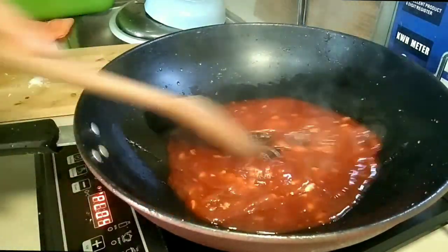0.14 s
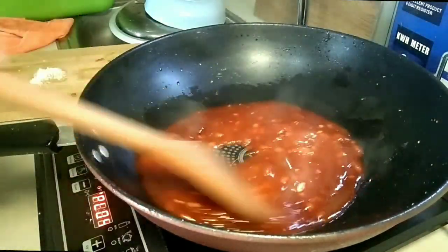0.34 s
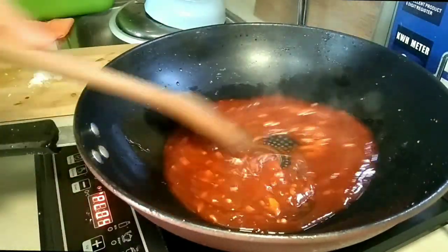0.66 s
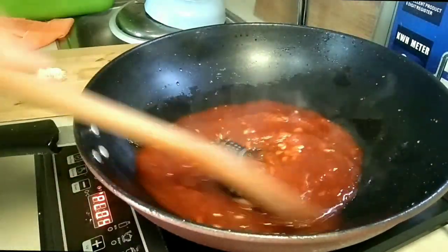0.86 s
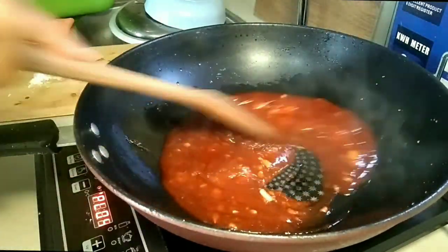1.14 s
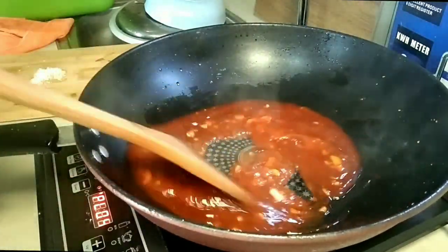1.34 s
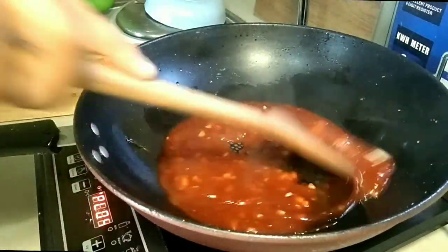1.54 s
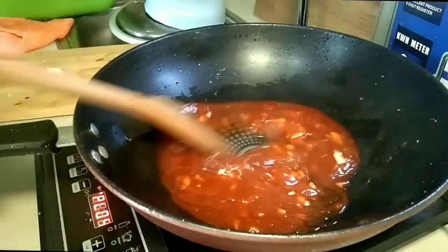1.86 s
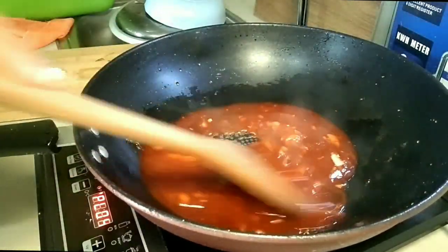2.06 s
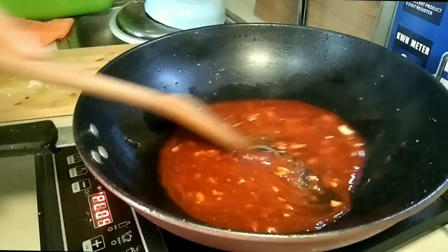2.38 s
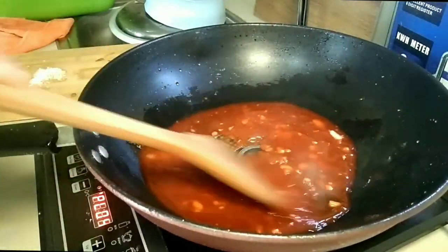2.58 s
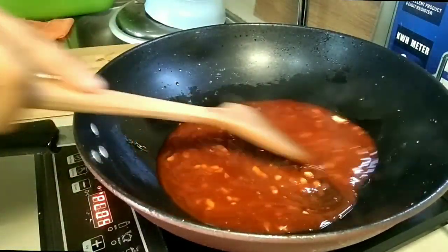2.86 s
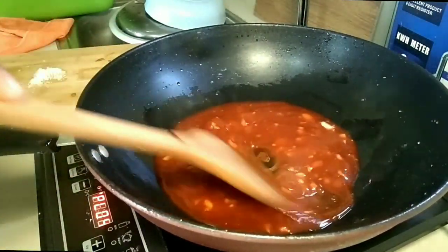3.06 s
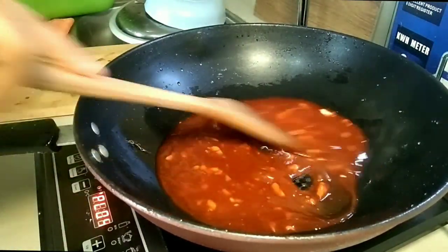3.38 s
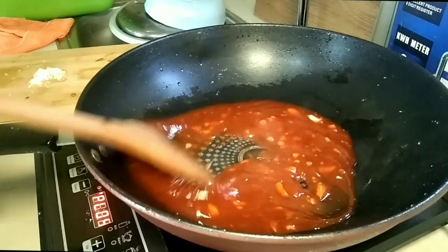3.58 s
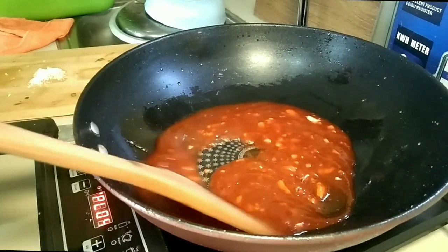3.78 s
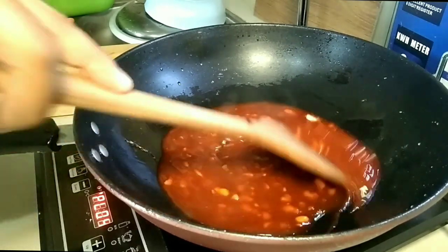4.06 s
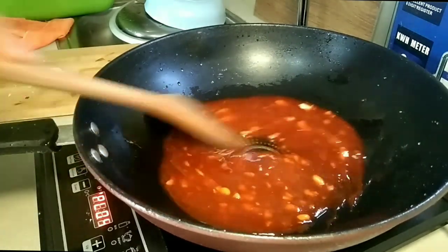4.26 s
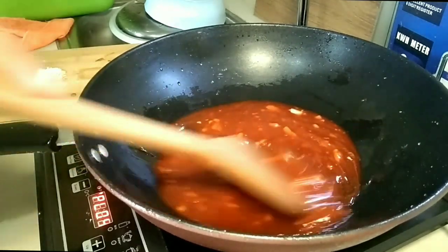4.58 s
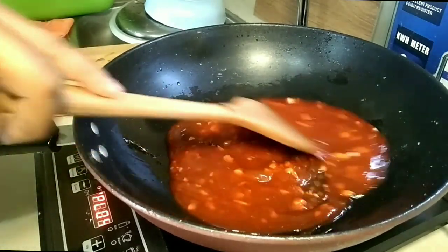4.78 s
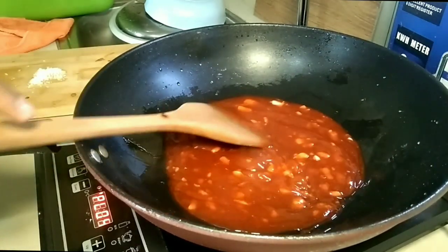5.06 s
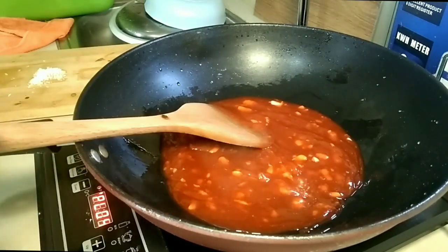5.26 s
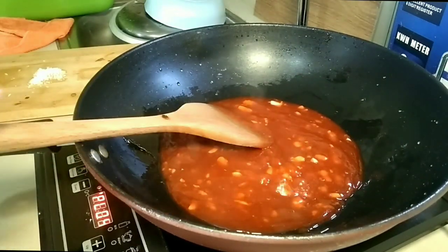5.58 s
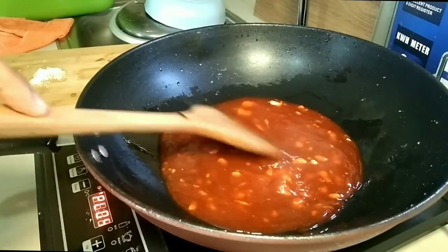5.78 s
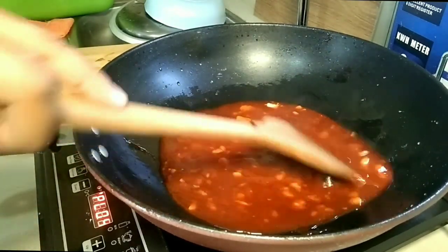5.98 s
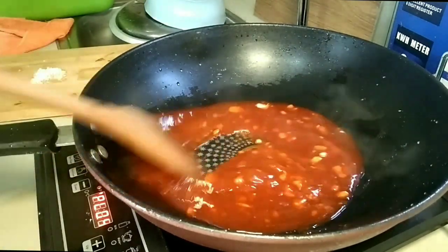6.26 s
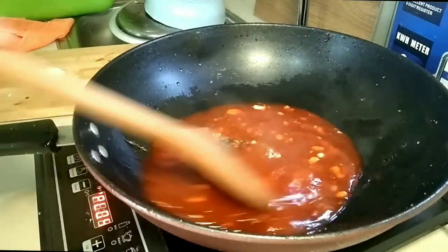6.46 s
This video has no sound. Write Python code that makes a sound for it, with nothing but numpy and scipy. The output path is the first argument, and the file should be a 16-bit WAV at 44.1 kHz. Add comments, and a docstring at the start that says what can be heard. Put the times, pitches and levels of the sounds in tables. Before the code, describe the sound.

Close, bursty frying hiss with snapping bubbles and wooden scrapes in a ringing wok, settling after two seconds, then briefly stirring up again.

```python
"""Thick sauce sizzles and spits in a steel wok while a wooden spatula scrapes through it, over the cooktop fan.
The sizzle is crackling noise with thin whistles; scraping, knocks and fan make the metal ring.
Splashes are swells of fizz, spits are snaps with a spray of steam, and plops are short rising tones.
A phone close by turns down whatever is steady, so the hiss comes in bursts and narrow flickering patches."""
import sys
import numpy as np
from scipy import signal
from scipy.fft import rfft, irfft, next_fast_len
from scipy.io import wavfile
from scipy.ndimage import uniform_filter1d

SR = 44100
rng = np.random.default_rng(int(sys.argv[2]) if len(sys.argv) > 2 else 0)


def file_out(sig):
    """Save sig as 16-bit WAV at sys.argv[1]."""
    # one column per channel
    cols = np.atleast_2d(sig).T
    # limit, then scale
    lim = np.clip(cols, -1, 1)
    pcm = np.round(lim * 32767).astype(np.int16)
    wavfile.write(sys.argv[1], SR, pcm)


N = 292383  # length in samples

# Table levels hold before the wall's ringing, the mix and the phone act on them.
# Sizzle of bared hot metal: (time [s], fine fizz [dB], coarse fizz [dB], wet crackle [dB])
SIZZLE_LEVELS = [(0.0, -38.5, -38.5, -45), (0.46, -38.5, -45, -49), (0.68, -35.5, -37, -43.5),
                 (0.96, -41, -44.5, -50.5), (1.2, -35.5, -43.5, -58), (1.48, -42, -47.5, -51),
                 (1.68, -44, -52.5, -68), (1.9, -43, -47.5, -52), (2.03, -49, -53.5, -56.5),
                 (2.3, -49.5, -55.5, -58), (2.6, -49.5, -63.5, -87), (3.4, -65, -79, -86),
                 (3.55, -55, -70.5, -81), (4.1, -50, -67, -105), (4.5, -57, -82, -77),
                 (5.07, -50, -55, -78), (5.5, -54.5, -89, -56), (5.7, -49.5, -76, -59),
                 (5.95, -46.5, -56, -59.5), (6.13, -48.5, -63, -60), (6.28, -43, -46, -46.5),
                 (6.45, -47, -62, -59.5), (6.63, -44, -54, -58.5)]
# Colour of each bubble size: (frequency [Hz], relative level [dB])
FINE_COLOUR = [(2350, -14), (4000, -11), (4390, -15.5), (5040, -0.5), (6220, -2), (8160, 1), (11000, -14),
               (14900, -24.5), (16000, -29)]
COARSE_COLOUR = [(2300, -6), (2900, -1.5), (3300, 6), (4000, 1), (4600, 3.5), (5300, -8), (6500, -48)]
WET_COLOUR = [(1500, -53), (1950, 9), (2300, 0), (2650, 3), (3200, -33.5)]
FINE_SPLIT_HZ, COARSE_SPLIT_HZ = 6320, 5230  # brightness tips about these pitches
WANDER_DB, WANDER_S = 2.5, 0.15  # typical drift of the bubble size, and the time between its turns
# Steam pockets that sing for a moment; each is loudest half of WHISTLE_S after it starts
WHISTLES_PER_S, WHISTLE_S, WHISTLE_SHARE = 550, 0.017, 0.44
# Upper resonances of the bare wall: (frequency [Hz], width [Hz], level before SHELL_DB is added [dB])
SHELL_MODES = [(2270, 65, 0.5), (2600, 22, -1), (2725, 107, -5), (3347, 25, -5.5), (3890, 40, 1),
               (5170, 41, -17), (8110, 920, -9.5)]
SHELL_DB = 1.5
# Two stretches of spatula dragging: (time [s], lower bowl drone [dB], upper bowl drone [dB], blade rasp [dB])
DRAG_LEVELS = [
    [(0.0, -45, -50, -52), (0.08, -50.5, -54, -69), (0.11, -47, -48, -50.5), (0.324, -57.5, -49.5, -54),
     (0.4, -60.5, -46.5, -48.5), (0.53, -48.5, -53.5, -57), (0.606, -47, -62, -45.5), (0.68, -47, -43, -45),
     (0.816, -52.5, -49, -56.5), (1.198, -57, -59, -53), (1.308, -61, -53, -55), (1.438, -76, -70, -52.5),
     (1.554, -55, -55, -62), (1.8, -84, -61, -85)],
    [(5.75, -91, -80, -83), (5.834, -60, -89, -76), (5.876, -53.5, -61, -52), (5.914, -60, -75, -57),
     (6.08, -82, -82, -80), (6.114, -51.5, -51, -70), (6.23, -72, -89, -110), (6.274, -50, -48.5, -45.5),
     (6.356, -49, -79, -65), (6.474, -62.5, -46.5, -87), (6.524, -54.5, -60, -79), (6.57, -55, -75, -75),
     (6.6, -75, -46.5, -88), (6.63, -77, -68, -76)],
]
# Bowl resonances: (frequency [Hz], width [Hz])
BOWL_MODES = [(570, 75), (775, 78)]
# Blade resonances: (frequency [Hz], width [Hz], relative level [dB])
BLADE_MODES = [(1577, 220, 0), (1306, 185, -14)]
# Colour of the fan rush and steady simmer: (frequency [Hz], relative level [dB])
STEADY_COLOUR = [(15, -46), (25, -31), (64, -7), (123, -10.5), (170, -5.5), (344, -10), (503, -12),
                 (1040, -4.5), (1480, -7.5), (3340, -15), (8140, -22), (11000, -31), (14800, -42),
                 (16000, -32)]
STEADY_DB = -48
# Fan housing resonances: (frequency [Hz], width [Hz], level [dB])
FAN_MODES = [(236, 72, -82), (414.2, 7.5, -62), (1028, 13, -61.5), (1625, 120, -60)]
# Spatula on the wok: (time [s], peak level [dB], best excited pitch [Hz], contact fade [s])
KNOCK_EVENTS = [(0.019, -39.5, 334, 0.044), (0.639, -34, 594, 0.017), (0.975, -41.5, 236, 0.0082),
                (1.385, -34.5, 1700, 0.014), (1.539, -42.5, 319, 0.022), (2.07, -42.5, 410, 0.0088),
                (2.445, -39.5, 570, 0.014), (3.479, -41.5, 1480, 0.013), (3.497, -40.5, 850, 0.0066),
                (3.927, -35, 340, 0.021), (4.521, -40.5, 333, 0.0063), (4.819, -41.5, 590, 0.004),
                (5.181, -31, 1350, 0.02), (5.197, -34, 1290, 0.017), (5.207, -44.5, 233, 0.027),
                (5.871, -41, 586, 0.024), (6.111, -42, 514, 0.0097), (6.208, -40, 400, 0.0046),
                (6.265, -38.5, 620, 0.004), (6.319, -46.5, 250, 0.012), (6.51, -37, 390, 0.025)]
# Ringing modes of the wok: (frequency [Hz], relative level [dB], time to fade by 60 dB [s])
WOK_MODES = [(236, 5, 0.16), (286.5, -2, 0.14), (409.5, 5.5, 0.092), (548.4, 6.5, 0.047), (758, 10.5, 0.04),
             (880, 5, 0.079), (1162, -2, 0.29), (1470, 4, 0.069), (1927, 3, 0.18), (2815, 2.5, 0.39)]
# The worktop is bumped: (time [s], peak level [dB], frequency [Hz], length [s])
WORKTOP_BUMP = (6.062, -52, 85, .035)
# Sauce slops onto the hot wall and fizzes up:
# (time [s], level before its swell and fade [dB], bubble pitch [Hz], spread [octaves], time to fade by 60 dB [s])
SPLASH_EVENTS = [(0.174, -23, 3070, 0.87, 0.17), (0.38, -31, 3500, 0.95, 0.15),
                 (0.492, -29.5, 6230, 0.55, 0.35), (0.655, -36, 5000, 1.3, 0.15),
                 (0.945, -35, 3160, 0.77, .15), (0.765, -29, 4530, .6, 0.19),
                 (1.05, -31.5, 3420, 0.42, 0.21), (1.385, -33, 2600, 0.88, 0.15),
                 (1.59, -44, 3580, 0.42, 0.28), (1.93, -51, 6500, .6, 0.2), (2.061, -64, 3350, .4, 0.17),
                 (2.16, -43.5, 6200, 0.58, 0.53), (2.35, -49, 6160, 0.62, 1),
                 (2.689, -42, 6600, 0.51, 0.44), (2.929, -49, 6950, .35, 0.91),
                 (3.229, -49, 7040, 0.28, 0.79), (3.43, -52, 8000, 0.34, 1),
                 (3.497, -49.5, 4660, 0.6, 0.81), (3.563, -45.5, 6850, 0.47, 1),
                 (3.89, -76, 7400, 0.48, .5), (4.118, -61, 5650, .6, 0.32),
                 (4.337, -35.5, 3680, 0.81, 0.23), (4.68, -48, 6000, 0.54, 0.73),
                 (5.02, -48.5, 7950, 0.28, 0.46), (5.18, -47, 2830, 0.2, 0.28),
                 (5.54, -43, 5100, 0.93, 0.23), (5.623, -33, 3650, 0.88, 0.37),
                 (6.19, -39.5, 5300, 0.7, 0.26), (6.264, -45, 3500, 1, 0.11), (6.321, -40, 5560, .8, 0.35),
                 (6.529, -51, 2750, 0.3, 0.11)]
SPLASH_RISE_S = 0.0032
# Bursting bubbles: (time [s], peak level [dB], centre [Hz], time for the tail to fade by 60 dB [s],
# spray under the snap [dB])
SPIT_EVENTS = [(0.178, -23.5, 2370, 0.12, -2), (0.389, -25.5, 3940, 0.053, 2),
               (0.4968, -22, 2720, 0.12, -1), (0.5595, -18.5, 4900, 0.08, 1),
               (0.6708, -19, 3310, 0.074, -7), (0.8785, -20, 7500, 0.087, -5),
               (0.9471, -20, 3450, 0.063, 0), (1.1119, -40, 7860, 0.13, -10), (1.134, -26, 8600, 0.14, -8),
               (1.384, -26.5, 1900, 0.12, -16), (1.5233, -28.5, 4160, 0.43, 1),
               (1.5911, -26, 3550, 0.13, -10), (1.6734, -28, 7300, 0.071, 4), (1.745, -43, 3780, 0.079, -1),
               (1.7926, -23, 7850, 0.057, -39), (1.83, -26, 7860, 0.049, -14),
               (1.933, -23.5, 5600, 0.16, -2), (1.963, -26.5, 7900, 0.18, 11),
               (2.0666, -30.5, 3700, 0.083, 2), (2.1637, -40, 6170, 0.22, -6),
               (2.207, -34.5, 2580, .15, -8), (2.3516, -35, 3240, 0.12, -6), (2.443, -33, 5800, 0.12, 2),
               (2.5635, -34, 6000, 0.11, -13), (2.6162, -36.5, 5450, 0.074, 0),
               (2.6918, -35.5, 7200, 0.17, 14), (2.9294, -30.5, 6400, 0.42, -14),
               (3.4974, -34, 7630, 0.24, -2.5), (3.5641, -29.5, 7900, 0.065, -30),
               (3.6327, -33.5, 7500, 0.15, -1), (3.698, -42, 8400, 0.095, -11),
               (3.724, -26.5, 6420, 0.2, -8.5), (3.8437, -39.5, 6680, 0.33, -2),
               (3.969, -34.5, 6670, 0.17, -6), (4.061, -63, 7370, 0.12, -14),
               (4.119, -31.5, 5760, 0.096, -4), (4.1688, -33, 5300, 0.063, -50),
               (4.301, -37, 7600, 0.39, 2), (4.341, -22.5, 3420, 0.17, -15), (4.681, -36.5, 4620, 0.18, -7),
               (4.807, -35, 3270, 0.12, -15), (5.012, -44, 7400, 0.17, -35),
               (5.0396, -39.5, 7880, 0.15, -12), (5.1796, -35, 2670, 0.3, -24),
               (5.5323, -36.5, 8300, 0.25, -29), (5.55, -37.5, 7700, 0.24, -2),
               (5.6246, -15, 4160, 0.17, -10), (5.7474, -37, 4780, 0.063, -30),
               (5.7816, -26, 7460, 0.083, -6), (5.83, -42, 7570, 0.082, -4),
               (5.875, -28.5, 7300, 0.071, -14), (5.9112, -39, 2590, 0.16, -6),
               (5.9714, -34, 5130, 0.13, -1), (6.151, -35, 8500, 0.14, -11), (6.1916, -32, 6200, 0.22, -13),
               (6.2628, -25, 4000, 0.096, -24), (6.323, -19, 7170, 0.041, 2), (6.4556, -36, 6760, 0.15, 0),
               (6.4875, -38, 5170, 0.16, 0), (6.5324, -30.5, 2320, 0.13, -8), (6.602, -28, 7960, 0.066, -9)]
# Large bubbles in the thick sauce: (time [s], peak level [dB], starting pitch [Hz])
PLOP_EVENTS = [(0.535, -42, 1103), (0.59, -41.5, 1250), (0.932, -39, 1345), (1.537, -44.5, 905),
               (1.62, -45.5, 890), (1.64, -46, 883), (1.73, -47, 890), (2.141, -45, 1026),
               (2.172, -48, 1010), (2.855, -48, 865), (3.106, -47.5, 880), (4.687, -44.5, 1120),
               (5.83, -43.5, 1200), (5.87, -44, 1247), (6.251, -41, 1464)]
PLOP_CYCLES, PLOP_GLIDE = 10.8, 0.012  # cycles in one unit of age, stretch of the phase per unit of age
# Phone: deepest cut, how much less the bass is cut, its extra threshold, and how far up the bass reaches
SUPPRESS_DB, BASS_LIFT_DB, BASS_OVER, BASS_HZ = -21, 9, 1.3, 1500
# Phone: threshold factor, averaging time, lean on the previous frame, quantile taken as the quiet level
OVER, HOLD_S, MEMORY, QUIET_SHARE = 0.8, 0.024, 0.96, 0.19
TOP_HZ = 15700


def undb(db):
    """Turn decibels into a gain."""
    return 10 ** (np.asarray(db) / 20)


def level(x, db):
    """Set the average strength (rms) of a sound."""
    return x * undb(db) / np.sqrt(np.mean(x ** 2))


def colour(x, points):
    """Shape the spectrum of a sound by (frequency, dB) points."""
    hz, db = np.transpose(points)
    size = next_fast_len(len(x))
    log_hz = np.log(np.arange(size // 2 + 1) * SR / size + 1)
    gain = undb(np.interp(log_hz, np.log(hz), db, -90, -90))
    return irfft(rfft(x, size) * gain, size)[:len(x)]


def band(x, hz, width):
    """Pass a sound through one resonance with gain 1 at its centre."""
    return signal.lfilter(*signal.iirpeak(hz, hz / width, fs=SR), x)


def curve(table):
    """Turn the level columns of a table into gains over time, near silent outside it."""
    s, *columns = np.transpose(table)
    return [undb(np.interp(np.arange(N) / SR, s, c, -120, -120)) for c in columns]


def add(out, s, x):
    """Mix a sound in at a time in seconds."""
    i = int(s * SR)
    out[i:i + len(x)] += x[:N - i]


def clock(seconds):
    """Count the time of each sample from zero."""
    return np.arange(int(seconds * SR)) / SR


def decay(t, t60):
    """Fade like a ringing object, by 60 dB in t60 seconds."""
    return np.exp(-np.log(1000) * t / t60)


def fizz(rate, spread_db, share, flicker_db):
    """Tiny bubbles of uneven size crackle over a hiss of steam; both come in clumps some 30 ms long."""
    sizes = undb(spread_db * rng.random(N))
    pops = (rng.random(N) < rate / SR) * sizes * np.sign(rng.standard_normal(N))
    steps = np.repeat(rng.standard_normal(N // 1300 + 1), 1300)
    clumps = uniform_filter1d(steps, 600)[:N]
    steam = rng.standard_normal(N)
    return (level(pops, 0) * share + steam) * undb(flicker_db * clumps)


def whistles():
    """Steam pockets sing brief thin tones scattered in pitch, time and size."""
    out, t = np.zeros(N), clock(0.12)
    shape = t / WHISTLE_S * np.exp(-2 * t / WHISTLE_S)
    for when, pitch, size in rng.random((int(WHISTLES_PER_S * N / SR), 3)):
        hz = 1700 * 7 ** pitch
        strength = np.sqrt(-hz * np.log(1 - size))  # many weak ones, few strong
        add(out, when * N / SR, shape * strength * np.sin(2 * np.pi * hz * t))
    return level(out, 0)


def wander():
    """Drift a gain at random, as the bubble size does."""
    knots = np.arange(0, N / SR + 1, WANDER_S)
    drift = np.interp(np.arange(N) / SR, knots, rng.standard_normal(len(knots)))
    return undb(WANDER_DB * drift)


def tilt(x, hz, gain):
    """Lift what lies above a pitch and lower what lies below, or the reverse."""
    top = colour(x, [(20, -60), (0.93 * hz, -30), (1.07 * hz, 0), (20000, 0)])
    return top * np.sqrt(gain) + (x - top) / np.sqrt(gain)


def sizzle():
    """Three bubble sizes crackle, each with its own colour; the brightness of two drifts with bubble size."""
    fine_gain, coarse_gain, wet_gain = curve(SIZZLE_LEVELS)
    song = WHISTLE_SHARE * whistles()
    fine = level(colour(fizz(900, 21, 0.9, 1.14) + song, FINE_COLOUR), 0)
    coarse = level(colour(fizz(400, 6.4, 1.0, 2.6) + song, COARSE_COLOUR), 0)
    wet = level(colour(fizz(200, 31.0, 0.25, 2.35) + song, WET_COLOUR), 0)
    fine = tilt(fine, FINE_SPLIT_HZ, wander())
    coarse = tilt(coarse, COARSE_SPLIT_HZ, wander())
    return fine_gain * fine + coarse_gain * coarse + wet_gain * wet


def shell(x):
    """The thin wall rings along with what bursts on it."""
    return x + sum(undb(SHELL_DB + db) * band(x, hz, width) for hz, width, db in SHELL_MODES)


def rub(hz, width):
    """Rubbing noise drives one resonance, filtered twice to quiet its surroundings."""
    return band(band(rng.standard_normal(N), hz, width), hz, 3 * width)


def drag():
    """Rubbing noise rings two resonances of the sauce-damped bowl and those of the blade."""
    *drone_gains, rasp_gain = np.sum([curve(part) for part in DRAG_LEVELS], axis=0)
    bowl = sum(gain * level(rub(hz, width), 0) for gain, (hz, width) in zip(drone_gains, BOWL_MODES))
    blade = sum(undb(db) * rub(hz, width) for hz, width, db in BLADE_MODES)
    return bowl + rasp_gain * level(blade, 0)


def steady():
    """Coloured noise for fan rush and even simmer, plus a few housing resonances driven by noise."""
    rush = level(colour(rng.standard_normal(N), STEADY_COLOUR), STEADY_DB)
    housing = sum(level(band(rng.standard_normal(N), hz, width), db) for hz, width, db in FAN_MODES)
    return rush + housing


def knocks():
    """The blade grates for a short contact, driving the wok modes near the struck spot's pitch."""
    out, t = np.zeros(N), clock(0.3)
    for s, db, hz, contact in KNOCK_EVENTS:
        ring = np.zeros(len(t))
        for mode_hz, mode_db, t60 in WOK_MODES:
            gain = undb(mode_db - 22.4 * np.log2(mode_hz / hz) ** 2)  # weaker far from the struck pitch
            ring += gain * np.sin(2 * np.pi * mode_hz * t) * decay(t, t60)
        grit = rng.standard_normal(len(t)) * np.exp(-t / contact)
        push = band((t == 0) * 70 + grit, hz, 0.56 * hz)  # a tap, then the grating
        hit = signal.fftconvolve(push, ring)[:len(t)]
        add(out, s, hit * undb(db) / np.abs(hit).max())
    return out


def thump():
    """A bump on the worktop gives one low tone that swells and dies smoothly."""
    out, t = np.zeros(N), clock(0.3)
    s, db, hz, length = WORKTOP_BUMP
    swell = np.sin(np.pi * np.minimum(t / length, 1)) ** 2
    add(out, s, undb(db) * np.sin(2 * np.pi * hz * t) * swell)
    return out


def splashes():
    """Sauce on the hot wall makes a quick swell of fizz around one bubble size, then fades."""
    out, t = np.zeros(N), clock(0.5)
    froth = fizz(600, 18, 0.6, 2) + WHISTLE_SHARE * whistles()
    scale = np.geomspace(500, 20000, num=40)
    for k, (s, db, hz, spread, t60) in enumerate(SPLASH_EVENTS):
        bell = np.transpose([scale, -6 * (np.log2(scale / hz) / spread) ** 2])
        piece = np.roll(froth, -k * N // len(SPLASH_EVENTS))[:len(t)]  # another stretch each time
        patch = level(colour(piece, bell), db)
        add(out, s, patch * (1 - np.exp(-t / SPLASH_RISE_S)) * decay(t, t60))
    return out


def spits():
    """A bursting bubble snaps, then its spray of steam dies away in the kitchen."""
    out, t = np.zeros(N), clock(0.3)
    for s, db, hz, t60, spray_db in SPIT_EVENTS:
        fade = np.exp(-t / 0.0015) + undb(spray_db) * decay(t, t60)
        burst = (t == 0) * 3 + rng.standard_normal(len(t)) * fade
        burst = band(band(burst, hz, 0.42 * hz), hz, 0.42 * hz)
        add(out, s, burst * undb(db) / np.abs(burst).max())
    return out


def plops():
    """A large bubble gives a short tone that rises a little as it opens."""
    out, t = np.zeros(N), clock(0.1)
    for s, db, hz in PLOP_EVENTS:
        age = t * hz / PLOP_CYCLES
        swell = np.e * 3 * age * np.exp(-3 * age)  # reaches 1 at a third of a unit of age
        tone = np.sin(2 * np.pi * hz * t * (1 + PLOP_GLIDE * age))
        add(out, s, undb(db) * swell * tone)
    return out


def scene():
    """Mix everything at the one microphone."""
    on_wall = shell(sizzle() + splashes() + spits()) * undb(-3.0)
    return (on_wall + drag() + steady() + knocks() + thump() + plops())[None]


def suppress(x):
    """Learn each band's quiet level; a band opens when sound stands well over it, then tends to stay open."""
    hz, _, z = signal.stft(x, SR, nperseg=768, noverlap=640)
    power = np.abs(z) ** 2
    keep = np.exp(-128 / SR / HOLD_S)  # frames are 128 samples apart
    held = signal.lfilter([1 - keep], [1, -keep], power, axis=1)
    quiet = np.quantile(held, QUIET_SHARE, axis=1, keepdims=True)
    bass = np.exp(-hz / BASS_HZ)
    over = (OVER + BASS_OVER * bass)[:, None]  # the bass opens less readily
    remainder = undb(SUPPRESS_DB + BASS_LIFT_DB * bass)  # but is pushed down less
    ratio = np.maximum(held, 0.77 * power) / (over * quiet)  # a strong onset counts at once
    gain, passed = np.empty(z.shape), ratio[:, 0]
    for k in range(z.shape[1]):
        # the guess of signal over noise leans on what passed in the frame before
        guess = MEMORY * passed + (1 - MEMORY) * np.maximum(ratio[:, k] - 1, 0)
        gain[:, k] = np.maximum(guess / (1 + guess), remainder)
        passed = gain[:, k] ** 2 * ratio[:, k]
    return signal.istft(z * gain, SR, nperseg=768, noverlap=640)[1][:N]


def record(dry):
    """The phone suppresses steady noise, then cuts steeply above TOP_HZ."""
    top_cut = signal.ellip(10, 0.2, 70, TOP_HZ, fs=SR, output="sos")
    return signal.sosfilt(top_cut, suppress(dry[0]))[None]


dry = scene()
out = record(dry)
file_out(out)
```